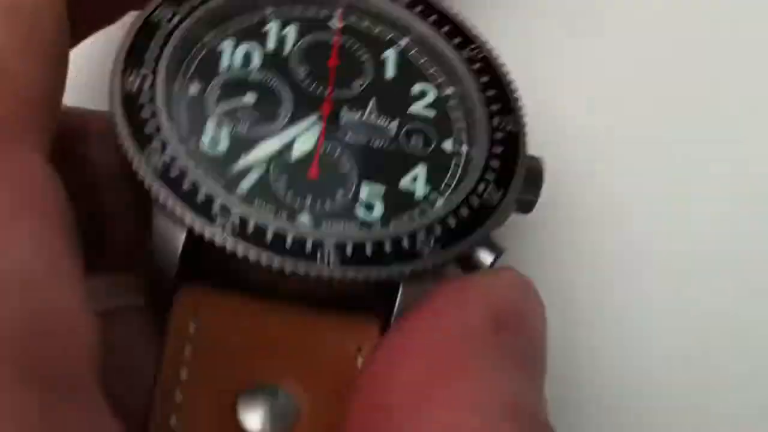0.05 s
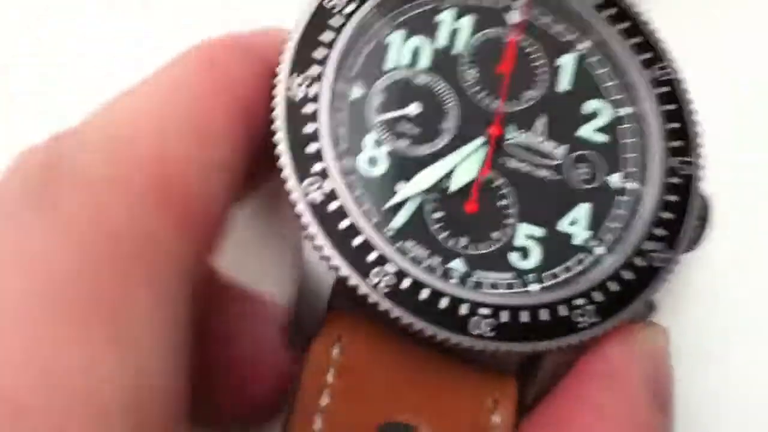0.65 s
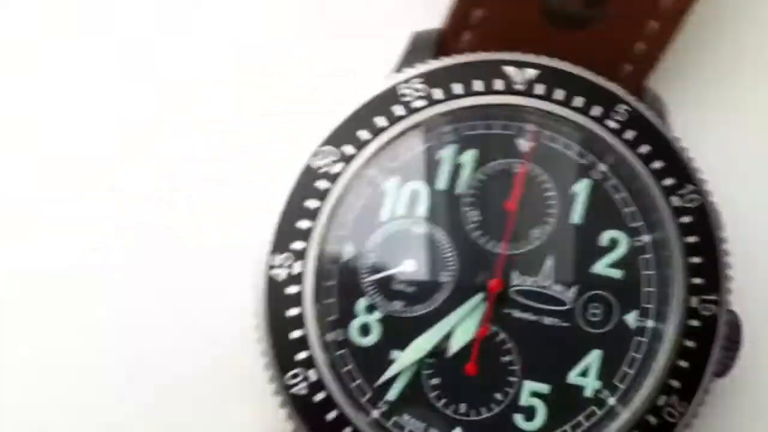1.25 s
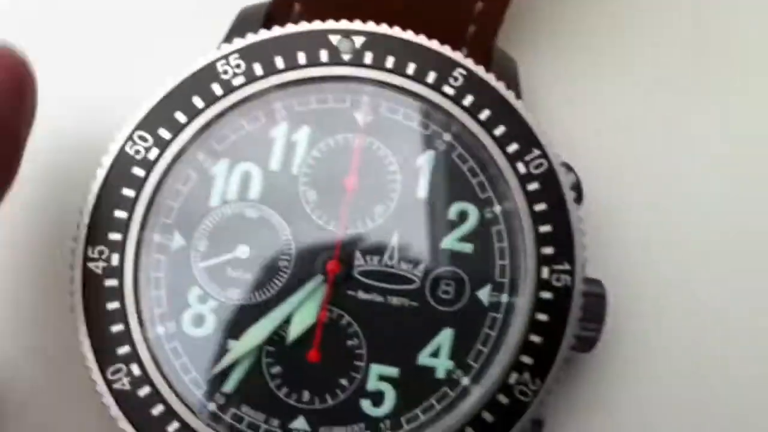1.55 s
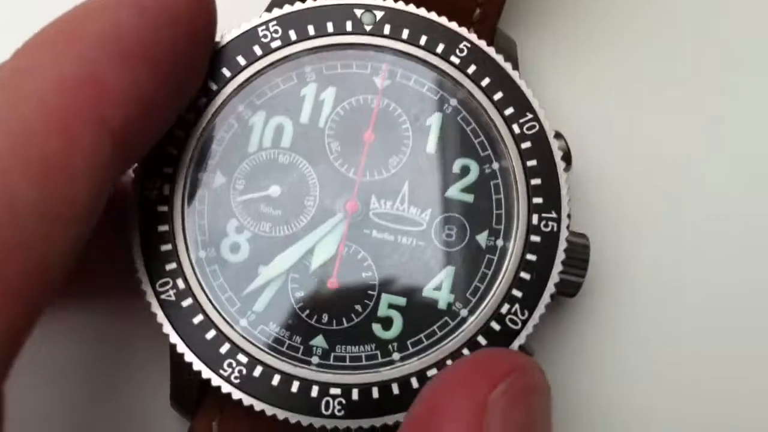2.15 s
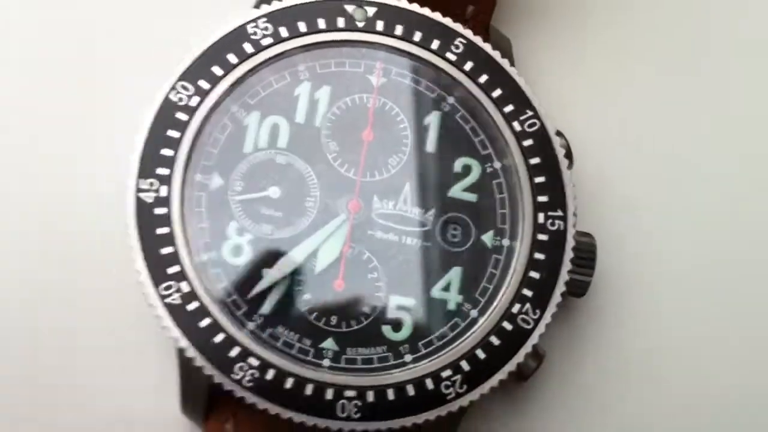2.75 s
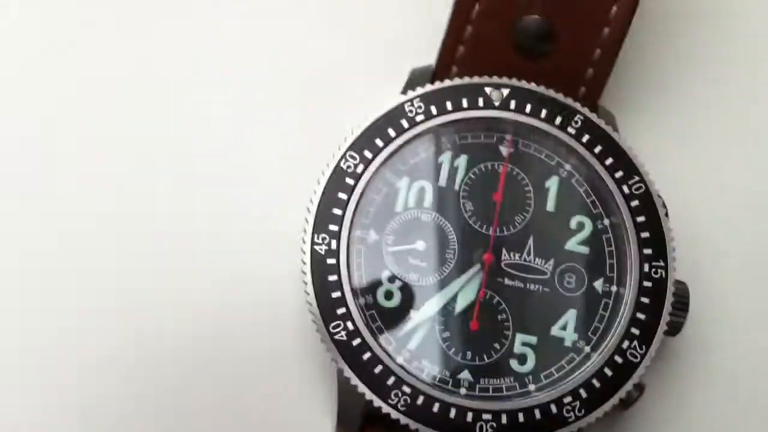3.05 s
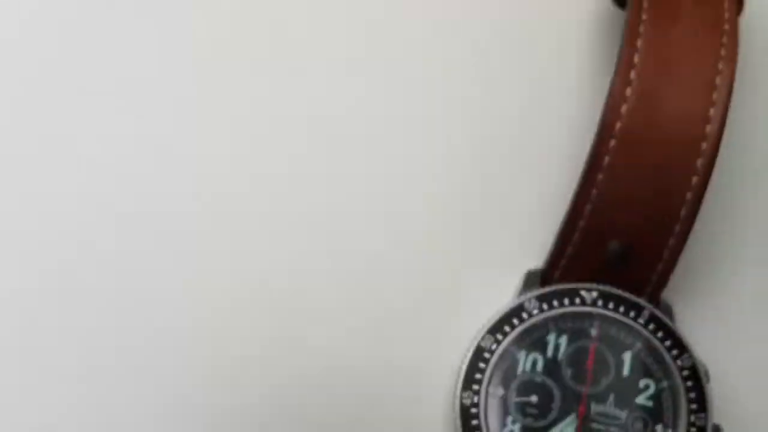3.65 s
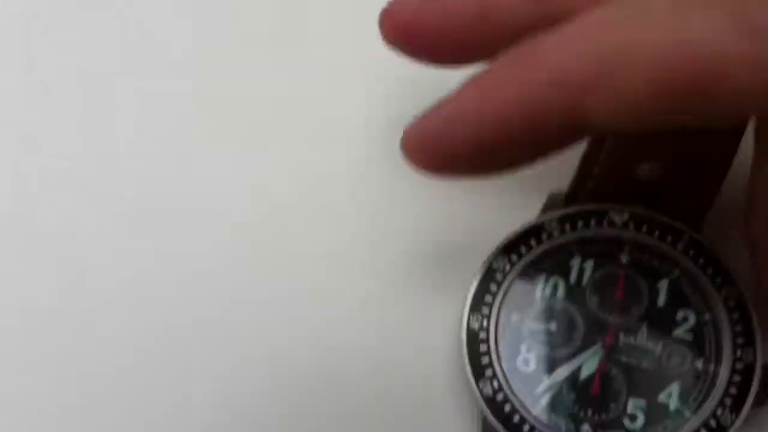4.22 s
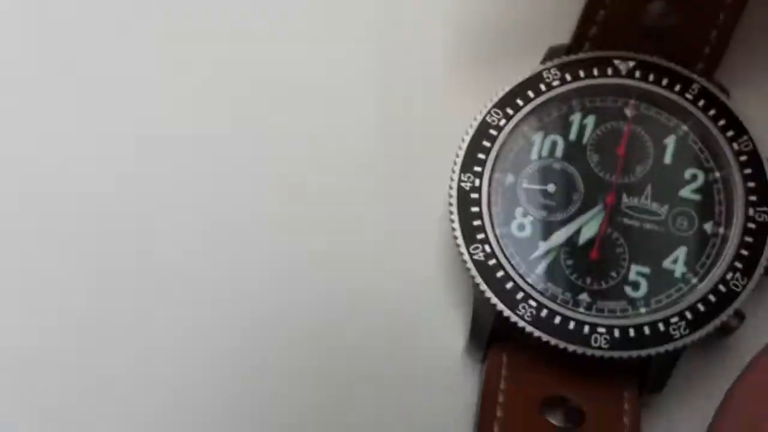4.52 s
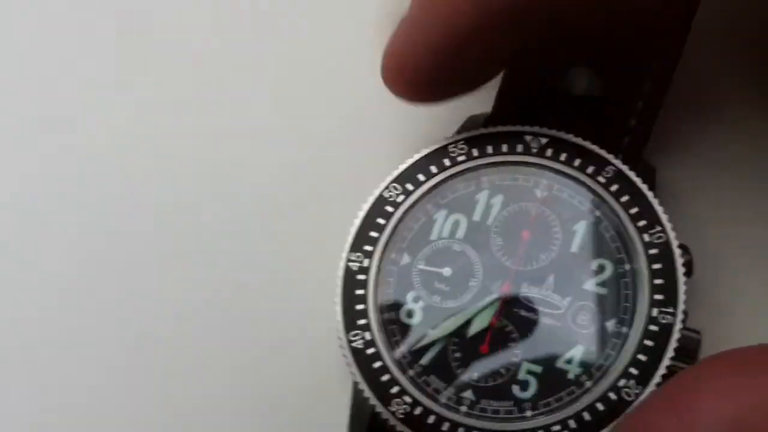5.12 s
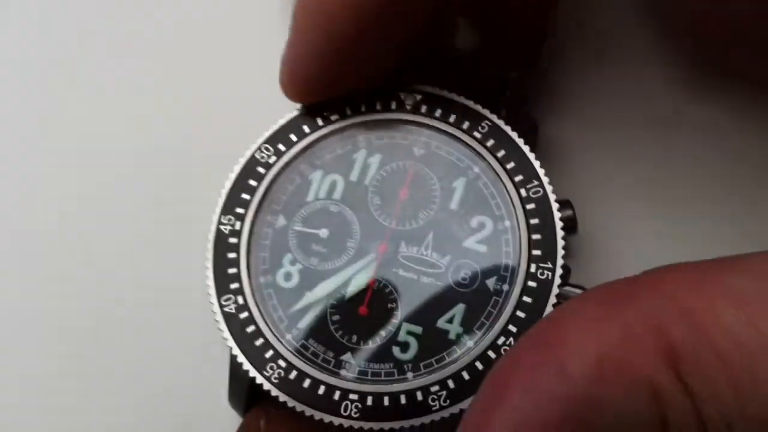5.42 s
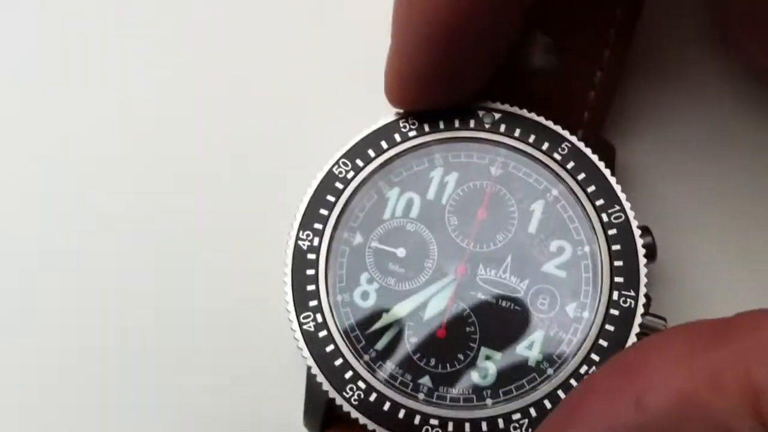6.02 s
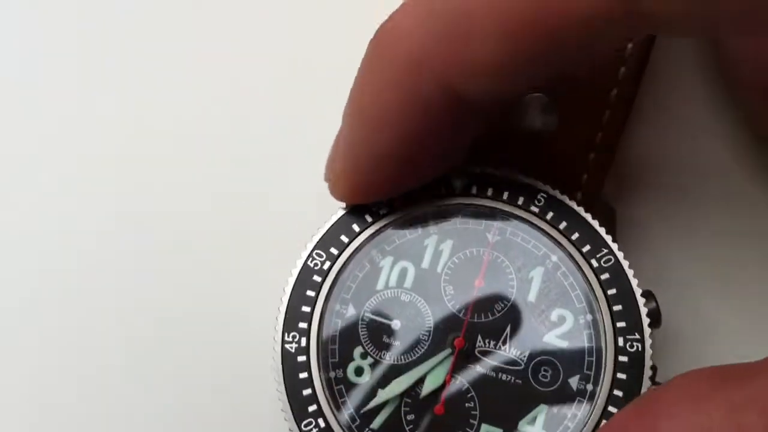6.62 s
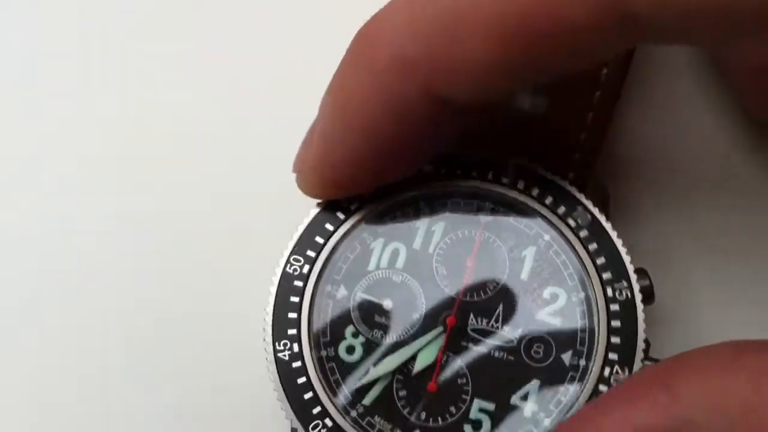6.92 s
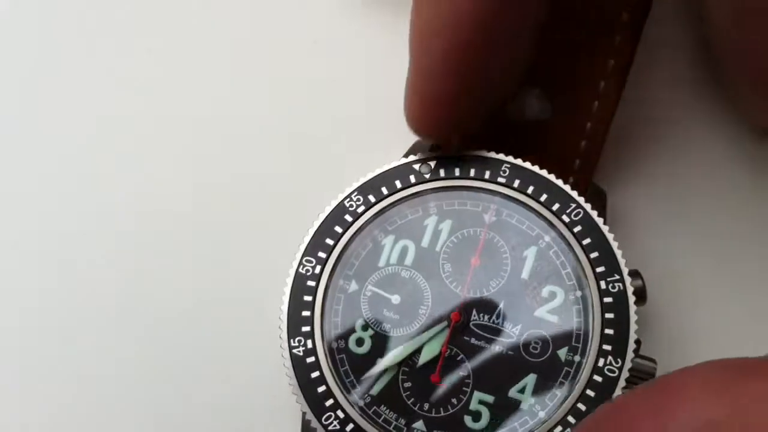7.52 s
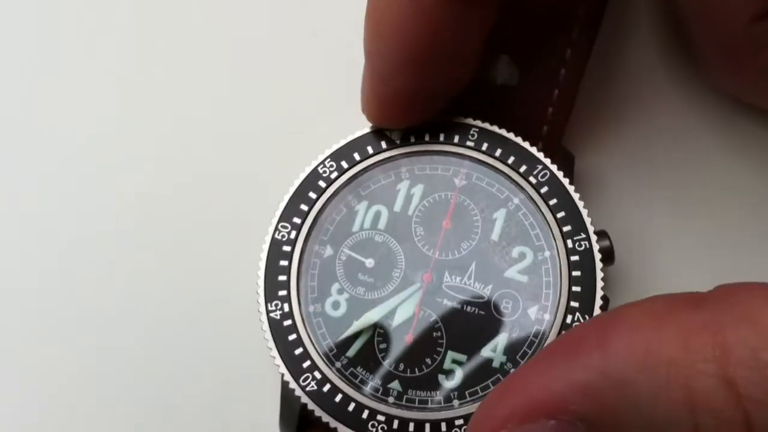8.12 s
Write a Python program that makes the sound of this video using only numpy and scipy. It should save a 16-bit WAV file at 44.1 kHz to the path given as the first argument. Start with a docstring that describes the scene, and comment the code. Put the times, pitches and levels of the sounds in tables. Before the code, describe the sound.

A steel wristwatch on a leather strap is handled on a desk, close up, over faint room hum and hiss. A hollow knock with a thin click comes at 0.2 seconds, amid rubbing and scraping. A fingertip judders briefly near 0.9 seconds, followed by a double knock at 1 second and more rubbing until 1.5. Another short rub comes just after 2 seconds, then a lull. From about 3 to 4.6 seconds the strap slides softly and the buckle and case give small metallic ticks, with a louder rub near 4.2. From 4.7 seconds fingers grip the watch and rasp quietly over its ridged rim, with light bumps and a hand brushing the desk around 5.5. Between 6.5 and 7.1 seconds the bezel turns through five small clicks, each ringing briefly with a soft thump. Finger rubbing continues, fading around 8 seconds.

```python
"""A steel wristwatch on a leather strap is handled on a desk, close up, over quiet room hum and hiss.
First hand and watch rub and knock on the desk top, which booms in its plate modes, with a few thin clicks.
The strap slides, a fingertip judders near 0.9 s, buckle and lugs tick, and the hand brushes the desk.
From 4.7 s fingers grip the watch and rasp over its knurled rim. From 6.5 s the bezel turns five notches:
each click rings briefly in the case and passes down into the desk."""
import sys
import numpy as np
from scipy import signal
from scipy.fft import rfft, irfft, next_fast_len
from scipy.io import wavfile
from scipy.ndimage import uniform_filter1d

SR = 44100
rng = np.random.default_rng(int(sys.argv[2]) if len(sys.argv) > 2 else 0)


def generate_wav(sig):
    """Save sig (samples, or channels by samples) to the path in sys.argv[1] as 16-bit PCM at SR."""
    pcm = np.round(np.clip(np.atleast_2d(sig).T, -1, 1) * 32767).astype(np.int16)
    wavfile.write(sys.argv[1], SR, pcm)


N = 369116
TIME_S = np.arange(N) / SR
AGE_S = TIME_S[:SR // 2]   # time since a hit
CUTOFF_HZ = 15900


def from_db(db):
    """Decibels to gain."""
    return 10 ** (np.asarray(db) / 20)


def unit_rms(x):
    """Scale to rms 1."""
    return x / np.sqrt(np.mean(x ** 2) + 1e-20)


def unit_attack(x):
    """Scale a hit to rms 1 over its loudest 4 ms."""
    return x / np.sqrt(uniform_filter1d(x ** 2, 176).max())


def cut(x, hz, kind, order=2):
    """Butterworth low-pass or high-pass."""
    return signal.sosfilt(signal.butter(order, hz, kind, fs=SR, output="sos"), x)


def colour(x, spectrum):
    """Shape x by (f/Hz, level/dB) points; rms 1."""
    hz, db = np.transpose(spectrum)
    size = next_fast_len(len(x))
    bins_hz = np.maximum(np.fft.rfftfreq(size, 1 / SR), 1)
    gain = from_db(np.interp(np.log(bins_hz), np.log(hz), db))
    return unit_rms(irfft(rfft(x, size) * gain, size)[:len(x)])


def decay(t60_s):
    """Envelope falling 60 dB in t60_s."""
    return np.exp(-np.log(1000) * AGE_S / t60_s)


def burst(t60_s):
    """Decaying white noise."""
    return rng.standard_normal(len(AGE_S)) * decay(t60_s)


def add(out, t_s, sound):
    """Mix a sound in at t_s."""
    start = round(t_s * SR)
    out[start:start + len(sound)] += sound[:N - start]


def ring(modes, scatter_db, column=2, tilt_db_oct=0, tilt_above_hz=5800, max_t60_s=0.28):
    """Decaying modes: the spot touched sets their levels, a hard touch lifts the top ones."""
    out = 0
    for k, mode in enumerate(modes):
        hz, t60_s = mode[:2]
        lift_db = tilt_db_oct * max(np.log2(hz / tilt_above_hz), 0)
        gain = from_db(mode[column] + lift_db + scatter_db * rng.standard_normal())
        polarity = (-1) ** (k // 2)
        out += polarity * gain * decay(min(t60_s, max_t60_s)) * np.sin(2 * np.pi * hz * AGE_S)
    return out


def slips(per_s, spread_db):
    """Stick-slip friction: tiny force pulses, random in time and size."""
    sizes = from_db(spread_db * np.minimum(rng.exponential(1, N), 4))
    return (rng.random(N) < per_s / SR) * sizes * rng.standard_normal(N)


def strokes(rows, column, roundness):
    """Stroke gain, 20 dB down one rise before and one fall after each peak; roundness 1 cusp, 2 bell."""
    power = np.zeros(N)
    for row in rows:
        t_s, rise_s, fall_s = row[:3]
        near = (TIME_S > t_s - 3 * rise_s) & (TIME_S < t_s + 3 * fall_s)
        away = np.maximum((t_s - TIME_S[near]) / rise_s, (TIME_S[near] - t_s) / fall_s)
        power[near] += from_db(row[column] - 20 * away ** roundness) ** 2
    return np.sqrt(power)


def rubbed(force, body, gain):
    """Friction force, swelling with the stroke, drives a ringing body."""
    steady_rms = np.std(signal.fftconvolve(force[:2 * SR], body, "valid"))
    return signal.oaconvolve(force * gain, body)[:N] / steady_rms


# room noise: f/Hz, level/dB
ROOM_SPECTRUM = [(15, -58), (25, -40.5), (59, -21.5), (160, -7.5), (195, -1), (240, -3), (326, -11.5),
                 (405, -9.5), (516, -11), (796, -15.5), (1190, -18), (1520, -17), (2480, -19.5),
                 (14800, -23.5), (16000, -19)]
def room(level_db=-64):
    """Steady hum and hiss of a quiet room."""
    return from_db(level_db) * colour(rng.standard_normal(N), ROOM_SPECTRUM)


# plate modes: f/Hz, t60/s (capped in ring), level/dB struck left, struck right, rubbed
DESK_MODES = [(216.2, 0.36, -29, 3.5, -12.5), (220.3, 0.48, 5.5, -6, -10.5), (268, 0.062, 9.5, -18, 0),
              (303, 0.43, -6, 4, -15), (349.5, 0.062, 5.5, -20, -3.5), (402.8, 0.065, 7, 6, 3),
              (453.2, 0.24, -15.5, 4, -8), (490, 0.23, 3.5, 2, -27.5), (524.5, 0.15, -14, 3.5, -2.5),
              (558.4, 0.056, 7, 7, -5), (611, 0.11, 6, -13.5, -8), (673, 0.098, -4.5, -5, -4.5),
              (782, 0.07, 10, -18, -4.5), (808.7, 0.17, -2, 8, -9), (884.3, 0.063, -22, -34, -1),
              (905, 0.12, -1.5, -1, -24.5), (990, 0.065, -2, 0.5, -2.5), (1065, 0.058, -23, -7, -9),
              (1172, 0.17, -14, -5, -23.5), (1292, 0.07, -27, 1, -4), (1405, 0.037, -16.5, -3.0, -16),
              (1615, 0.14, -13.0, -28, -27)]
# dense ring: f/Hz, level/dB
DESK_SPECTRUM = [(200, -16.5), (700, -4.5), (1100, -1), (1500, -2.5), (2000, -2.5), (3000, -8),
                 (4000, -13.5), (8000, -34.5)]
# hollow notches where neighbouring modes cancel: f/Hz
DESK_NULLS_HZ = [370, 431, 676, 738]
def desk(spot, scatter_db, dense_db, dense_t60_s=0.17, lowest_hz=198):
    """Desk response: clear plate modes over a dense ring; little radiates below the first mode."""
    dense = colour(rng.standard_normal(len(AGE_S)), DESK_SPECTRUM) * decay(dense_t60_s)
    column = {"left": 2, "right": 3, "rubbed": 4}[spot]
    sound = ring(DESK_MODES, scatter_db, column) + from_db(dense_db) * dense
    for hz in DESK_NULLS_HZ:
        sound = signal.lfilter(*signal.iirnotch(hz, Q=32, fs=SR), sound)
    radiation = signal.cheby1(7, 0.5, lowest_hz, "high", fs=SR, output="sos")
    return signal.sosfilt(radiation, sound)


# steel scrape force: f/Hz, level/dB
SCRAPE_SPECTRUM = [(300, -24.5), (620, -11.5), (850, -2.5), (1500, 3.5), (2000, -5.5), (3000, -7),
                   (5000, -11.5), (9000, -18)]
# strokes on the desk: peak t/s, rise/s, fall/s, relative level/dB of skin drag, steel scrape, palm
RUBS = [(0.005, 0.11, 0.13, -54, -48, -47.5), (0.195, 0.071, 0.05, -63, -34, -63),
        (0.245, 0.074, 0.12, -36, -45, -36.5), (0.49, 0.089, 0.094, -45, -63, -42),
        (0.595, 0.11, 0.14, -50, -54, -62), (0.815, 0.11, 0.076, -39.5, -46.5, -47.5),
        (0.9, 0.11, 0.093, -39, -37.5, -63), (1.06, 0.13, 0.099, -32.5, -44, -36),
        (1.17, 0.21, 0.18, -32, -44.5, -40.5), (1.355, 0.076, 0.14, -35, -49, -44),
        (1.44, 0.084, 0.03, -34.5, -53.5, -57), (1.57, 0.088, 0.5, -67, -68.5, -69),
        (2.042, 0.017, 0.063, -41, -65, -42), (2.155, 0.11, 0.098, -28, -39.5, -40),
        (2.33, 0.094, 0.27, -67, -85, -62.5), (2.62, 0.11, 0.088, -63.5, -81, -62.5),
        (3.8, 0.86, 0.79, -76, -70, -68), (4.244, 0.033, 0.048, -28, -39.5, -42),
        (4.285, 0.059, 0.061, -38, -49, -47.5), (4.52, 0.61, 0.34, -66, -61.5, -69),
        (4.645, 0.081, 0.028, -56.5, -69, -56)]
def rubbing(skin_hz=880, palm_hz=330):
    """Through the desk: skin drags in soft slips, steel scrapes in hard ones, the palm booms low."""
    body = desk("rubbed", scatter_db=0.4, dense_db=-3)
    drag = cut(slips(per_s=1400, spread_db=0.35), skin_hz, "low")
    drag = cut(drag, palm_hz, "high", order=4)
    palm = cut(slips(per_s=1500, spread_db=0.2), palm_hz, "low", order=4)
    scrape = colour(slips(per_s=4000, spread_db=1), SCRAPE_SPECTRUM)
    return (rubbed(drag, body, from_db(-4.5) * strokes(RUBS, column=3, roundness=1.65))
            + rubbed(scrape, body, from_db(-2.5) * strokes(RUBS, column=4, roundness=1.42))
            + rubbed(palm, body, from_db(-1) * strokes(RUBS, column=5, roundness=1.4)))


def tap(low_hz, high_hz, t60_s):
    """Dry sound of a contact, straight through the air."""
    dulled = cut(burst(t60_s), high_hz, "low", order=4)
    return unit_attack(cut(dulled, low_hz, "high"))


# thin, bright clicks: t/s, level/dB, high-pass f/Hz
BRIGHT_CLICKS = [(0.1605, -45.5, 5000), (0.2113, -55, 2000), (6.1485, -53.5, 10500), (6.5537, -55, 2500),
                 (6.7525, -54.5, 3500), (6.916, -55.5, 3020), (7.087, -53, 9100)]
def bright_clicks():
    """Thin clicks with no ring: small springs snapping, and the sharp crack of the first knock."""
    out = np.zeros(N)
    for t_s, db, low_hz in BRIGHT_CLICKS:
        add(out, t_s, from_db(db) * tap(low_hz, CUTOFF_HZ, t60_s=0.00384))
    return out


def shudder(low_hz=80, high_hz=125, t60_s=0.31):
    """A blow shakes the desk frame, low and briefly."""
    rumble = cut(burst(t60_s), high_hz, "low", order=3)
    return unit_attack(cut(rumble, low_hz, "high", order=3))


# blows on the desk: t/s, relative level/dB, contact low-pass f/Hz, spot struck
KNOCKS = [(0.211, -12, 1410, "left"), (0.508, -39, 1360, "right"), (0.579, -42.5, 1400, "left"),
          (0.744, -50, 1400, "right"), (0.9765, -19, 1390, "right"), (0.997, -14.5, 1375, "right"),
          (2.605, -54.5, 1390, "right"), (4.903, -48, 1362, "right"), (5.142, -37, 1380, "left"),
          (7.26, -46.5, 1000, "right")]
def knocks(trim_db=-4):
    """A dry tap rings the desk, duller for a soft contact, and shakes its frame."""
    out = np.zeros(N)
    for t_s, db, contact_hz, spot in KNOCKS:
        plate = desk(spot, scatter_db=0.5, dense_db=-6.5)
        boom = unit_attack(cut(plate, contact_hz, "low", order=1))
        contact = from_db(-4) * tap(low_hz=352, high_hz=1140, t60_s=0.0096)
        frame = from_db(-36) * shudder()
        add(out, t_s, from_db(db + trim_db) * (boom + contact + frame))
    return out


# leather hiss: f/Hz, level/dB
STRAP_SPECTRUM = [(500, -19.5), (1200, 2.5), (2000, 10.5), (3200, -1), (4200, -2), (5800, 1), (8000, 0.5),
                  (12000, -5.5), (16000, -5)]
# strap slides: peak t/s, rise/s, fall/s, relative level/dB of hiss, sizzle
SLIDES = [(0.75, .6, 0.94, -70.5, -72), (1.21, 0.039, 0.15, -59.5, -76), (1.48, 0.14, 0.14, -78, -56.5),
          (1.62, 0.29, 0.46, -77.5, -62.5), (2.6, 0.15, 0.15, -75.5, -67), (3.76, 0.66, 0.25, -66, -76.5),
          (4.02, 0.57, 0.33, -68, -63.5), (4.5, 0.21, 0.17, -66, -57.5), (4.57, 0.059, 0.092, -53, -51.5),
          (5.0, 1, 0.57, -69, -86)]
def strap_slides(sizzle_above_hz=3900):
    """Dense friction grains of leather radiate into the air; the same hiss goes with each scrape."""
    slide_gain = strokes(SLIDES, column=3, roundness=1.81)
    scrape_gain = from_db(-17) * strokes(RUBS, column=4, roundness=1.26)
    hiss = colour(slips(per_s=29000, spread_db=3.5), STRAP_SPECTRUM)
    sizzle = unit_rms(cut(slips(per_s=24800, spread_db=3.5), sizzle_above_hz, "high"))
    return (from_db(1.5) * np.hypot(slide_gain, scrape_gain) * hiss
            + from_db(0.5) * strokes(SLIDES, column=4, roundness=0.99) * sizzle)


def noise_band(hz, half_width_hz):
    """Narrow noise around a fixed or moving pitch; rms 1."""
    waver = cut(rng.standard_normal((2, N)), half_width_hz, "low", order=3)
    phase = 2 * np.pi * np.cumsum(hz * np.ones(N)) / SR
    return unit_rms(waver[0] * np.cos(phase) + waver[1] * np.sin(phase))


# fingertip push: t/s, f/Hz, level/dB
JUDDER = [(0.77, 434.5, -68), (0.80, 442, -39), (0.825, 485, -32), (0.85, 497, -42), (0.88, 506, -34.5),
          (0.90, 558, -40), (0.922, 548, -29.5), (0.96, 553, -42.5)]
def finger_judder(desk_mode_hz=803):
    """Loosely regular slips of a fingertip: a rough, rising groan that wakes one desk mode."""
    t_s, hz, db = np.transpose(JUDDER)
    groan = noise_band(np.interp(TIME_S, t_s, hz), half_width_hz=38)
    desk_mode = from_db(-6) * noise_band(desk_mode_hz, half_width_hz=22)
    gain = from_db(np.interp(TIME_S, t_s, db, left=-np.inf, right=-np.inf))
    return gain * (groan + desk_mode)


# small steel parts damped by leather: f/Hz, t60/s, level/dB
BUCKLE_MODES = [(1870, 0.0051, 0), (2830, 0.011, -12), (4850, 0.011, -4.5), (5610, 0.0059, 3),
                (6860, 0.0042, -1), (10020, 0.0076, -4), (11900, 0.014, -13), (13700, 0.0043, -13)]
# buckle and lug contacts: t/s, steel level/dB, treble tilt/(dB/oct), desk tap level/dB
TICKS = [(0.9973, -49.5, -1, -46), (2.927, -80.5, -11, -61.5), (3.101, -57.5, -21, -52),
         (3.5802, -44, -4, -44.5), (3.588, -51, 9, -46.5), (3.6208, -39, -10, -47),
         (3.675, -76, -12, -58.5), (3.798, -71, -12, -53), (3.853, -74, -14, -61), (3.873, -77, -12, -54),
         (4.5614, -36, 12, -57), (4.5641, -37, 5, -62), (4.6093, -43.5, -19, -51)]
def buckle_ticks(room_db=-25, room_t60_s=0.11):
    """Steel touches steel: a very short ring, a faint room tail and a dry tap on the desk."""
    out = np.zeros(N)
    for t_s, steel_db, tilt_db_oct, tap_db in TICKS:
        steel = unit_attack(ring(BUCKLE_MODES, scatter_db=2, tilt_db_oct=tilt_db_oct))
        tail = colour(rng.standard_normal(len(AGE_S)), STRAP_SPECTRUM) * decay(room_t60_s)
        contact = from_db(tap_db) * tap(low_hz=115, high_hz=990, t60_s=0.018)
        add(out, t_s, from_db(steel_db) * (steel + from_db(room_db) * tail) + contact)
    return out


# skin hiss: f/Hz, level/dB
BRUSH_SPECTRUM = [(35, -48), (60, -35), (81, -1), (146, -22), (346, 4.5), (480, -10), (903, -3.5),
                  (991, -8), (1110, -6), (2840, -2.5), (4030, -9.5), (6140, -8), (16000, -17.5)]
# hand sweeps: peak t/s, rise/s, fall/s, level/dB
BRUSHES = [(3.75, 0.056, 0.093, -60), (5.55, .14, .14, -51)]
def hand_brushes():
    """The hand brushes the desk: fine friction grains of skin radiate into the air."""
    hiss = colour(slips(per_s=18000, spread_db=2.5), BRUSH_SPECTRUM)
    return strokes(BRUSHES, column=3, roundness=1.97) * hiss


# case held in the fingers: f/Hz, t60/s, level/dB
CASE_MODES = [(848, 0.048, 6), (900, 0.024, 11.5), (1285, 0.037, 6.5), (1516, 0.026, 20.5),
              (1630, 0.023, -8.5), (1870, 0.01, 13)]
# rasp force on the rim: f/Hz, level/dB
KNURL_SPECTRUM = [(500, -18), (900, -3), (1300, -1), (1600, -1), (2000, -1), (2400, -6), (3200, -17),
                  (6000, -28)]
# finger pushes: peak t/s, rise/s, fall/s, relative level/dB of skin drag, rim rasp
GRIPS = [(4.75, 0.049, 0.023, -73, -57.5), (4.8, 0.039, 0.052, -44.5, -51.5),
         (4.92, 0.076, 0.078, -47, -56), (4.985, 0.053, 0.044, -50.5, -61), (5.09, 0.25, 0.22, -48, -67),
         (5.29, 0.09, 0.15, -61.5, -59), (5.445, 0.072, 0.027, -52.5, -70), (5.53, 0.1, 0.5, -61, -64),
         (6.35, 0.049, 0.039, -49.5, -67), (6.52, 0.15, 0.26, -55, -68), (6.72, 0.053, 0.1, -48, -55.5),
         (6.89, 0.034, 0.14, -46.5, -54), (7.066, 0.026, 0.1, -42, -52.5), (7.19, 0.083, 0.043, -49, -65),
         (7.235, 0.015, 0.027, -46, -55.5), (7.265, 0.072, 0.13, -50, -66),
         (7.475, 0.06, 0.017, -35.5, -51.5), (7.515, 0.069, 0.067, -60.5, -50.5),
         (7.77, 0.04, 0.057, -74.5, -61.5), (7.99, 0.05, 0.045, -70.5, -56), (8.04, 0.2, 0.13, -80, -63)]
def gripping(skin_hz=470, lowest_hz=250, grip_t60_s=0.06):
    """Fingers press the watch onto the desk and rasp over the knurled rim, ringing the damped case."""
    drag = cut(slips(per_s=1400, spread_db=1), skin_hz, "low")
    drag = cut(drag, lowest_hz, "high", order=3)
    rasp = colour(slips(per_s=1700, spread_db=1.5), KNURL_SPECTRUM)
    dense = unit_rms(burst(grip_t60_s))
    case = dense + 0.55 * unit_rms(ring(CASE_MODES, scatter_db=0) * decay(grip_t60_s))
    plate = desk("rubbed", scatter_db=1.96, dense_db=1.5)
    return (rubbed(drag, plate, from_db(-1.5) * strokes(GRIPS, column=3, roundness=1))
            + rubbed(rasp, case, from_db(-2) * strokes(GRIPS, column=4, roundness=1.26)))


# notches: t/s, relative level/dB, click offset/dB, ring tilt/(dB/oct), grip damping t60/s
NOTCHES = [(6.555, -41, -2.5, 6, 0.029), (6.752, -42, -1.5, 13, 0.088), (6.917, -41.5, 2.5, 8, .2),
           (7.059, -49.5, 5.5, -12, .06), (7.091, -45.5, 7, -11, .3)]
def bezel_clicks(thump_hz=300, press_t60_s=1.0):
    """The spring drops into a notch, rattles the gripped case and thumps the desk under the hand."""
    out = np.zeros(N)
    for t_s, db, click_db, tilt_db_oct, grip_t60_s in NOTCHES:
        plate = desk("left", scatter_db=3.5, dense_db=-6)
        thump = from_db(-1.5) * unit_attack(cut(plate, thump_hz, "low", order=1) * decay(press_t60_s))
        snap = (AGE_S == 0) + from_db(-25) * burst(t60_s=0.1)   # impulse plus rattle
        modes = ring(CASE_MODES, scatter_db=1.5, tilt_db_oct=tilt_db_oct, tilt_above_hz=CASE_MODES[0][0])
        case = unit_attack(signal.fftconvolve(snap, modes * decay(grip_t60_s))[:len(AGE_S)])
        contact = from_db(-3) * tap(low_hz=327, high_hz=1630, t60_s=0.013)
        click = from_db(click_db - 1) * (case + contact)
        frame = from_db(-21) * shudder()
        add(out, t_s, from_db(db) * (click + thump + frame))
    return out


def scene():
    """Hits and friction over room noise; mono."""
    hits = knocks() + bezel_clicks() + buckle_ticks() + bright_clicks()
    friction = rubbing() + gripping() + finger_judder() + strap_slides() + hand_brushes()
    return (hits + friction + room())[None]


def record(dry):
    """Steep elliptic low-pass."""
    return signal.sosfilt(signal.ellip(12, 0.1, 80, CUTOFF_HZ, fs=SR, output="sos"), dry)


dry = scene()
out = record(dry)
generate_wav(out)
```